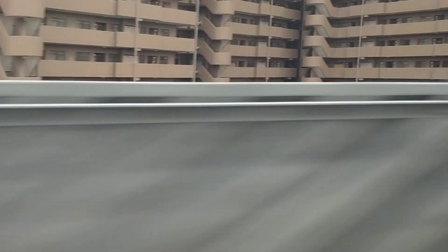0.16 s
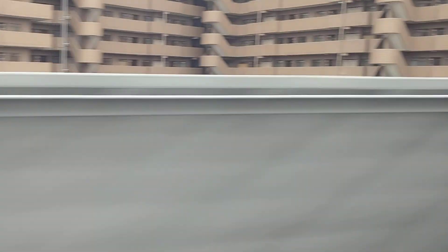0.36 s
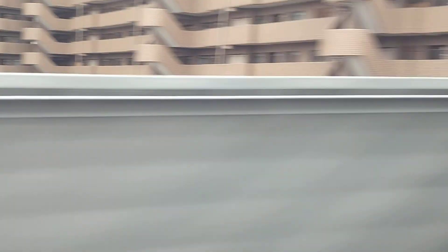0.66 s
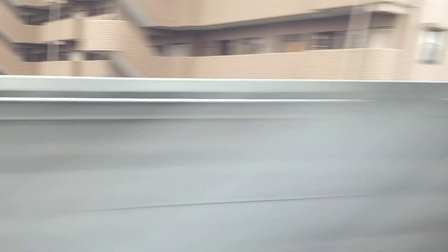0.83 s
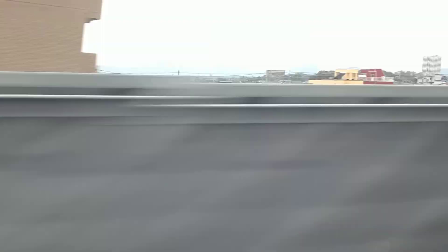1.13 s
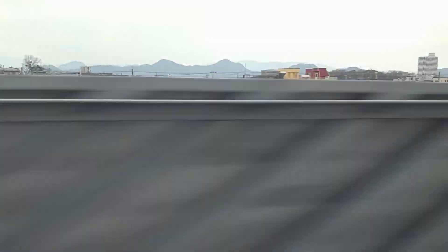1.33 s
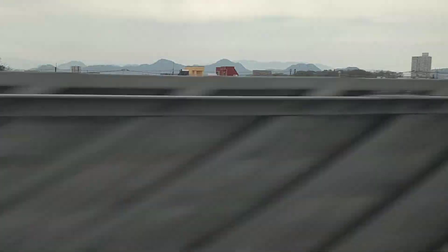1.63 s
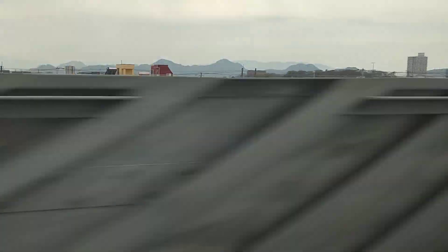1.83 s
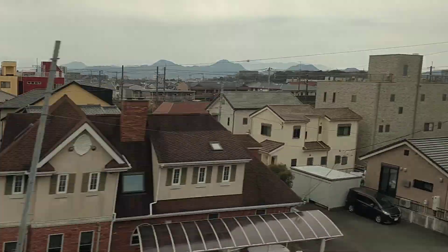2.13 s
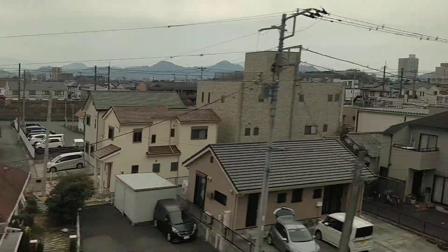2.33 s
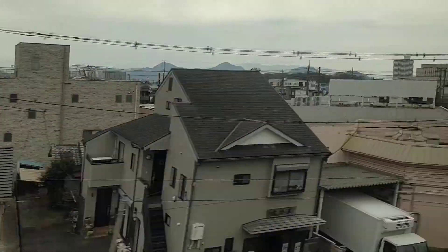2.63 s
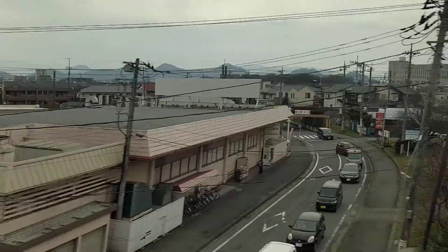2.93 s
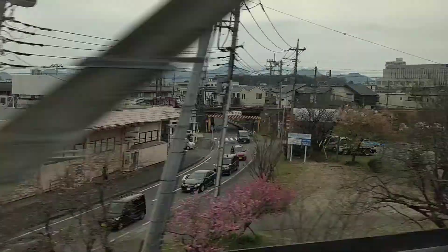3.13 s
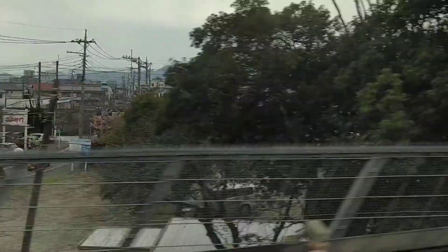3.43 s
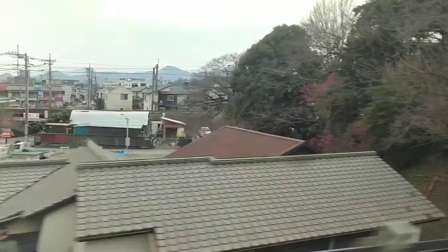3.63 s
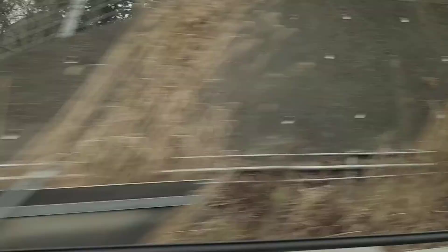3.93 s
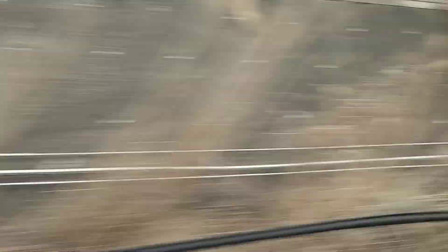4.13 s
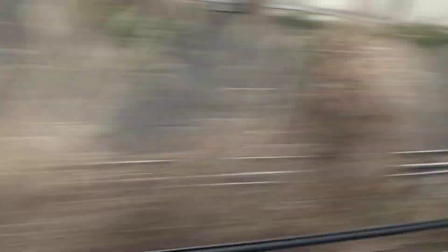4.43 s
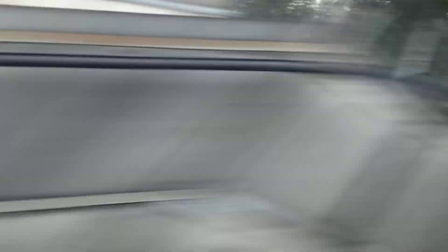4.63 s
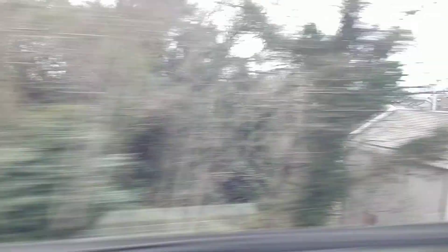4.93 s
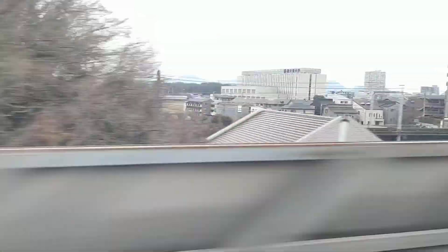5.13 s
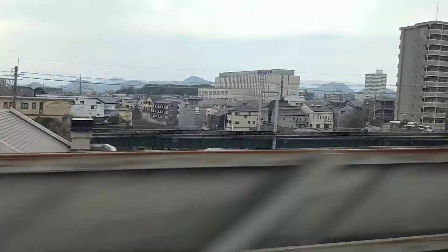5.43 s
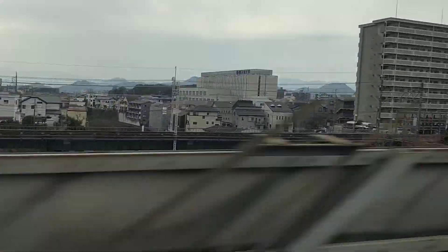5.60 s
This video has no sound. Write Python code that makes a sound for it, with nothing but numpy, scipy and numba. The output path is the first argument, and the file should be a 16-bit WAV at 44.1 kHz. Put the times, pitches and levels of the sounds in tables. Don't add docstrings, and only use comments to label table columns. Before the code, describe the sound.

Inside a fast train near the window, a heavy, trembling bass rumble dominates throughout. Softer wheel roar and airy hiss rise and fall as walls pass outside, surging just after one second and strongest after five. A faint wavering motor whine flickers early. Close plastic wrapper ticks and crackles cluster around one second, then thin out. A phone captures it in stereo, compressing the bass and pumping slightly.

```python
import sys
import numpy as np
from scipy import signal
from scipy.fft import rfft, irfft, next_fast_len
from scipy.io import wavfile
from scipy.ndimage import uniform_filter1d
from numba import njit

SR = 44100
rng = np.random.default_rng(int(sys.argv[2]) if len(sys.argv) > 2 else 0)


def voltage_ratio(decibels):
    exponent = np.asarray(decibels, float) / 20
    return 10 ** exponent


def output_pcm(signal):
    pcm = np.clip(np.atleast_2d(signal).T, -1, 1) * 32767
    wavfile.write(sys.argv[1], SR, np.round(pcm).astype(np.int16))


N = 254016

# (frequency [Hz], level per Hz [dB])
RUMBLE_TONE = [(4, -9), (17, 0), (24, -2.5), (31, -.5), (46, -6), (57, 2.5), (68, -3.5), (79, 0), (95, -5),
               (130, -16), (200, -50), (400, -120)]
DRUM_TONE = [(25, -120), (80, -11), (110, 5.5), (140, -3), (160, -1), (200, -4.5), (260, -15), (330, -23),
             (430, -62.5), (800, -120)]
LOW_ROAR_TONE = [(100, -63), (200, -4.5), (260, -2), (310, -2.5), (400, -7), (500, -11.5), (620, -19.5),
                 (800, -42), (1600, -120)]
ROAR_TONE = [(250, -63), (450, -2), (560, -4.5), (640, -2), (780, -3), (900, -6), (1200, -8.5),
             (1500, -13.5), (1800, -18), (2300, -54), (4000, -120)]
AIR_TONE = [(700, -62), (1500, -8.5), (1870, 1.5), (2280, 3), (2500, -1.5), (3000, -0.5), (3400, -2.5),
            (3700, 4), (4100, -4), (5400, -10.5), (6000, -15), (7700, -17), (9200, -32), (14000, -95)]
TOP_TONE = [(5000, -70.5), (8600, -9), (9200, -7.5), (10800, -2.5), (12700, -4), (13600, 0), (14400, -8),
            (15700, 1), (18000, -45)]
# (frequency [Hz], likeness [0-1])
LIKENESS = [(25, .998), (60, .98), (130, .985), (290, .87), (640, .55), (1400, .33), (3100, .33),
            (6800, .15), (15000, .05)]
# (frequency
# [Hz], phase [rad])
PORT_PHASE = [(20, -.03), (80, -.14), (250, -.3), (780, -.55), (1550, -2.6), (1890, -2.9), (3530, -8.4),
              (16000, -30)]
# (frequency [Hz], left minus right [dB])
PORT_BALANCE = [(60, 1), (110, .8), (200, 0), (380, 1.5), (700, 1), (1290, 1.8), (2380, 5), (4400, 0),
                (8120, -5), (11000, 4), (15000, 6)]
# (time [s], gain [dB])
WALLS = [(0.05, -2.5), (0.54, -1.5), (0.92, -1.5), (1.17, 8.5), (1.33, 2), (1.6, -1.5), (2.15, -1),
         (2.31, 3.5), (2.45, 1), (2.76, 2.5), (3.32, -1.5), (3.52, 4), (3.82, 1.7), (4.79, -0.26),
         (5.05, 4.5), (5.26, 10.5), (5.43, 6.5), (5.72, 8)]
# (time [s], gain [dB])
RUMBLE_SWELL = [(0.05, 4.5), (0.43, -2.5), (0.6, -1), (1.98, 1), (2.31, -3), (2.45, 2), (2.8, -3), (3.35, 2),
                (3.56, -3), (3.84, -1), (4.09, 2), (4.17, -2), (4.5, 4), (4.69, -6), (5.02, 5.5), (5.26, -4),
                (5.72, 5)]
# (frequency [Hz], width [Hz], level [dB])
PANEL_MODES = [(2270, 91, -7.5), (3736, 430, -5.5)]
# (time [s], peak level [dB], hold [s])
WHINE_BURSTS = [(0.26, -56.5, .05), (0.52, -52.5, .03), (0.67, -50.5, 0.027), (0.78, -54.5, 0.12),
                (1.41, -58, .03), (1.59, -59, .02), (1.72, -60, .01), (1.84, -61, .02), (2.003, -61, .05),
                (2.64, -55, 0.037), (2.547, -54.5, .02)]
# (frequency [Hz], width [Hz], level [dB])
TICK_MODES = [(4130, 1200, -1.5), (5300, 1000, 4.5), (6660, 850, -3.5), (8200, 1000, -15)]
BRIGHT_MODES = [(9840, 800, -4.5), (11800, 1500, -4.5), (13400, 2400, -1), (15000, 830, -1.5)]
BODY_MODES = [(2070, 840, 12), (2900, 410, -11.5), (3580, 660, 2)]
# (time [s], crackle level [dB], hold [s], brightness [dB])
RUSTLE = [(0.919, -59, 0.0054, -12.5), (0.966, -51, 0.0036, -10.5), (1.058, -47, 0.033, -15.5),
          (1.106, -46.5, 0.022, -23.5), (1.172, -52, .004, -17.5), (1.712, -58, 0.065, -12.5),
          (1.788, -51, 0.0036, -8.5), (2.663, -69, 0.0043, -16), (2.722, -63.5, 0.17, -1),
          (3.005, -63.5, 0.099, -2), (3.112, -63, 0.007, -2.5), (4.562, -71.5, 0.15, -2),
          (3.65, -65, 0.012, -14.5), (3.758, -61, 0.035, -18), (4.973, -62.5, .006, -12),
          (5.038, -59.5, 0.011, -10), (5.134, -53, 0.064, -22)]
# (time [s], peak level [dB], strongest ring [Hz], brightness [dB], body [dB])
TICKS = [(0.372, -49, 4360, -7.5, 1.5), (0.5153, -42.5, 4870, -11.5, 7), (.6609, -45, 5100, -15.5, -2),
         (0.7511, -43, 4620, -14, 11.5), (0.9255, -51.5, 5840, -30, 10), (0.9554, -30, 6100, -9, -2.5),
         (1.056, -41, 5400, -19, -8.5), (1.0754, -34, 5720, -26.5, -2), (1.0907, -39, 6230, -25, -2.5),
         (1.111, -39.5, 5300, -27, -5.5), (1.1607, -43, 6200, -22.5, -2), (1.7584, -44.5, 4600, -5.5, -5.5),
         (1.7962, -32.5, 5110, -10.5, -4.5), (1.816, -43, 5000, -26.5, -4), (2.1385, -49.5, 6500, -14, -4),
         (2.2115, -41, 5010, -14, 4.5), (2.3362, -41, 5550, -24, -3), (2.6515, -37, 4820, -22, -5.5),
         (3.6476, -45, 4230, -17, 2.5)]
# (time [s], drop [dB])
DUCKS = [(0.073, 4.5), (0.556, 1), (0.702, 1.5), (0.792, 2.5), (1.0, 4.5), (1.135, 6), (1.21, 5),
         (1.369, 3.5), (1.876, 2.5), (2.054, 6), (2.125, 3.5), (2.348, 7.5), (2.45, 2.5), (2.932, 5),
         (3.096, 1.5), (3.402, 8), (3.607, 4.5), (3.806, 3.5), (4.041, 6.5), (4.267, 6), (4.475, 5.5),
         (4.906, 7.5), (5.073, 5.5), (5.307, 5.5), (5.647, 5.5)]


def unit(x):
    return x / np.sqrt(np.mean(x ** 2))


def curve(table):
    s, value = np.transpose(table)
    return np.interp(np.arange(N) / SR, s, value)


def over_hz(table, hz):
    f, value = np.transpose(table)
    return np.interp(np.log(hz), np.log(f), value)


def walk(rate):
    hold = max(int(SR / rate), 2)
    steps = np.repeat(rng.standard_normal(N // 200 + 1), hold)[:N + hold]
    return 0.43 * uniform_filter1d(uniform_filter1d(steps, hold), hold)[:N]


def burst_db(s, db, hold_s, rise_db_s, fall_db_s):
    t = np.arange(N) / SR
    before, after = np.maximum(s - t, 0), np.maximum(t - s - hold_s, 0)
    return db - rise_db_s * before - fall_db_s * after


def ring(x, modes):
    out = 0
    for k, (hz, width, db) in enumerate(modes):
        b, a = signal.iirpeak(min(hz, .45 * SR), hz / width, SR)
        out = out + (-1) ** k * voltage_ratio(db) * signal.lfilter(b, a, x)
    return out


def field(tone, flicker_db, flicker_rate, grit_db, count):
    size = next_fast_len(N)
    hz = np.maximum(np.arange(size // 2 + 1) * SR / size, 1)
    drive = rng.standard_normal((3, size)) * voltage_ratio(grit_db * rng.exponential(size=size))
    shared, left, right = rfft(drive)
    alike = np.clip(over_hz(LIKENESS, hz), 0, 1)
    late = np.exp(1j * over_hz(PORT_PHASE, hz))
    common = np.sqrt(alike) * shared * np.array([late, late ** 0])
    separate = np.sqrt(1 - alike) * np.array([left, right])
    pair = (common + separate) * voltage_ratio(over_hz(tone, hz))
    low_hz, high_hz = tone[1][0], tone[-2][0]
    place = np.clip(np.log(hz / low_hz) / np.log(high_hz / low_hz), 0, 1) * (count - 1)
    out = 0
    for k in range(count):
        band = np.clip(1 - abs(place - k), 0, 1)
        out = out + voltage_ratio(flicker_db * walk(flicker_rate)) * irfft(pair * band, size)[:, :N]
    return out / np.sqrt(np.mean(out.mean(axis=0) ** 2))


def body_rumble(swell_db):
    return voltage_ratio(-11.5 + swell_db) * field(RUMBLE_TONE, 0.28, 5.8, 0.072, count=2)


def floor_drum(swell_db, wall_db):
    db = -18 - 0.2 * swell_db + 0.12 * wall_db
    return voltage_ratio(db) * field(DRUM_TONE, 0.68, 4.1, 0.12, count=2)


def rolling_roar(swell_db, wall_db):
    low_db = -30 - 0.2 * swell_db + 0.59 * wall_db
    low = voltage_ratio(low_db) * field(LOW_ROAR_TONE, 0.98, 3.3, 0.65, count=2)
    high = voltage_ratio(-42 + 0.81 * wall_db) * field(ROAR_TONE, 0.69, 23.0, 0.17, count=4)
    return low + high


def air_hiss(wall_db):
    air = voltage_ratio(-52 + 0.77 * wall_db) * field(AIR_TONE, 4.2, 9.1, 2.2, count=5)
    top = voltage_ratio(-69 + 0.37 * wall_db) * field(TOP_TONE, 7, 11, 1.4, count=3)
    gust_db = burst_db(2.7, 1.5, hold_s=.55, rise_db_s=20, fall_db_s=12)
    panel = voltage_ratio(np.maximum(-8, gust_db)) * ring(air, PANEL_MODES)
    return air + panel + top


def train():
    wall_db, swell_db = curve(WALLS), curve(RUMBLE_SWELL)
    low = body_rumble(swell_db) + floor_drum(swell_db, wall_db)
    return low + rolling_roar(swell_db, wall_db) + air_hiss(wall_db)


def motor_whine():
    bursts = [burst_db(*row, rise_db_s=115, fall_db_s=93.5) for row in WHINE_BURSTS]
    db = np.max(bursts, axis=0) + 6.5 * walk(24)
    pitch_hz = 1781 - 7 * np.arange(N) / SR + 22 * walk(40)
    phase = 2 * np.pi * np.cumsum(pitch_hz) / SR
    return np.sqrt(2) * voltage_ratio(db) * np.sin(phase + np.array([[-.7], [.7]]))


def wrapper_rustle():
    happens = rng.random(N) < 2500 / SR
    grains = happens * rng.standard_normal(N) * voltage_ratio(3.2 * rng.exponential(size=N))
    smear = np.exp(-np.arange(900) / 160) * rng.standard_normal((2, 900))
    creases = signal.fftconvolve(grains[None], smear, axes=1)[:, :N]
    dull = unit(ring(ring(creases, TICK_MODES), [(6300, 6800, 0)]))
    bright = unit(ring(ring(creases, BRIGHT_MODES), [(13500, 6000, 0)]))
    out = 0
    for s, db, hold_s, bright_db in RUSTLE:
        level_db = burst_db(s, db, hold_s, rise_db_s=1196.5, fall_db_s=399.5)
        out = out + voltage_ratio(level_db) * (dull + voltage_ratio(bright_db) * bright)
    return out


def wrapper_ticks():
    out = np.zeros((2, N))
    t = np.arange(int(.3 * SR)) / SR
    sides = np.array([[.5], [-.5]])
    for s, db, hz, bright_db, body_db in TICKS:
        noise = rng.standard_normal((3, len(t)))
        crack = np.minimum(t / 0.0008, 1) * np.exp(-t / .0025) * (noise[0] + 0.14 * noise[1:])
        tail = voltage_ratio(-14) * np.minimum(t / 0.0033, 1) * voltage_ratio(-60 * t / 0.18) * noise[1:]
        blow = crack + tail
        snap = ring(blow, TICK_MODES) + voltage_ratio(11.5) * ring(blow, [(hz, 900, 0)])
        pan_db = -3.5 - 1.7 * s
        gain = voltage_ratio(db + pan_db * sides) / abs(snap).max()
        bright = ring(ring(blow, BRIGHT_MODES), [(12500, 5800, 0.0071)])
        snap = snap + voltage_ratio(bright_db + 17 + 6.5 * sides) * bright
        snap = snap + voltage_ratio(body_db) * ring(blow, BODY_MODES)
        i = int(s * SR)
        out[:, i:i + len(t)] += gain * snap
    return out


def scene():
    return train() + motor_whine() + wrapper_rustle() + wrapper_ticks()


def pumping():
    recovery_s = 0.13
    t = np.arange(N) / SR
    db = 0
    for s, drop_db in DUCKS:
        db = db - drop_db * (t > s) * np.exp(-np.maximum(t - s, 0) / recovery_s)
    return voltage_ratio(uniform_filter1d(db, 700) + 1.31)


@njit
def follow(x, attack, release):
    e, out = .2, np.empty(len(x))
    for i in range(len(x)):
        e += (x[i] - e) * (attack if x[i] > e else release)
        out[i] = e
    return out


def hold_bass(bass):
    envelope = follow(abs(bass).max(axis=0), 1 / (0.0022 * SR), 1 / (0.088 * SR))
    gain = uniform_filter1d(np.minimum(0.21 / envelope, 1) ** 0.54, 200)
    ceiling = .66
    return ceiling * np.tanh(bass * gain * voltage_ratio(3.5) / ceiling)


def low_pass(x):
    return signal.sosfilt(signal.butter(12, 15820, fs=SR, output="sos"), x)


def record(dry):
    size = next_fast_len(N)
    hz = np.maximum(np.arange(size // 2 + 1) * SR / size, 1)
    tilt_db = over_hz(PORT_BALANCE, hz) / 2
    both = rfft(dry, size) * voltage_ratio(np.array([tilt_db, -tilt_db]))
    x = irfft(both, size)[:, :N]
    bass = irfft(both / (1 + (hz / 260) ** 4), size)[:, :N]
    return low_pass(pumping() * (x - bass) + hold_bass(bass))


dry = scene()
out = record(dry)
output_pcm(out)
```